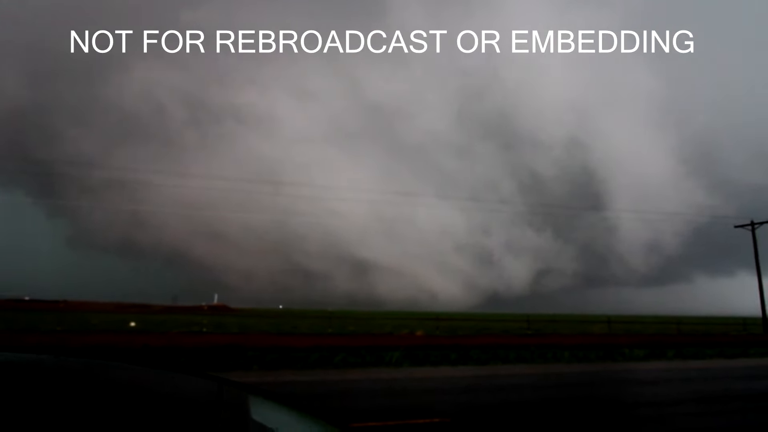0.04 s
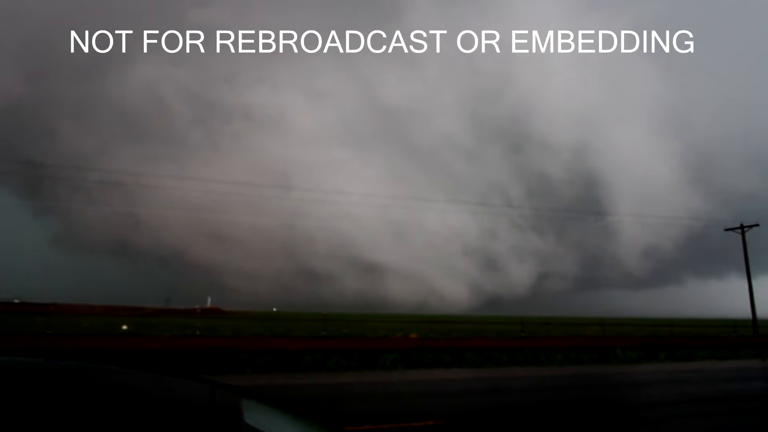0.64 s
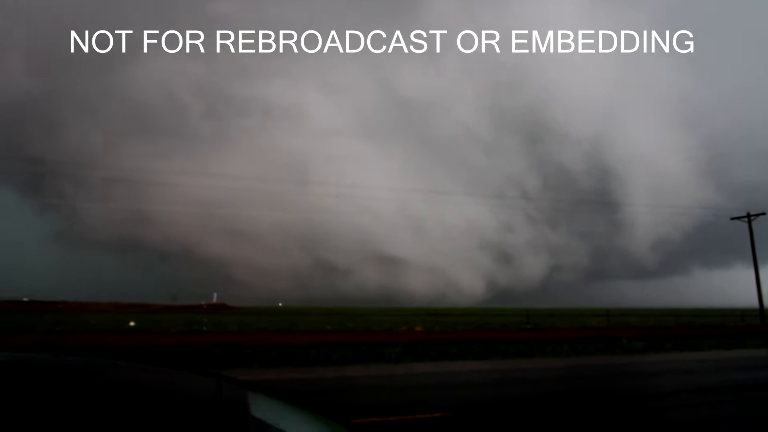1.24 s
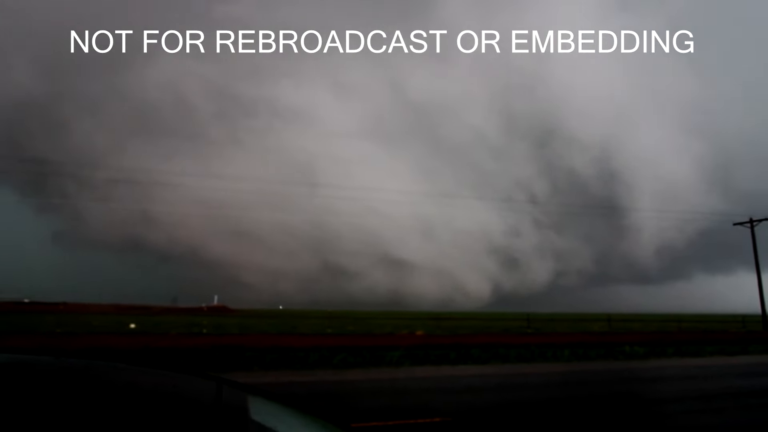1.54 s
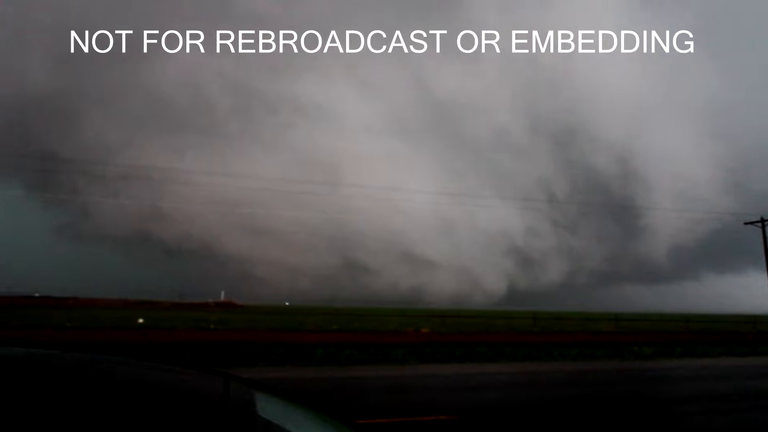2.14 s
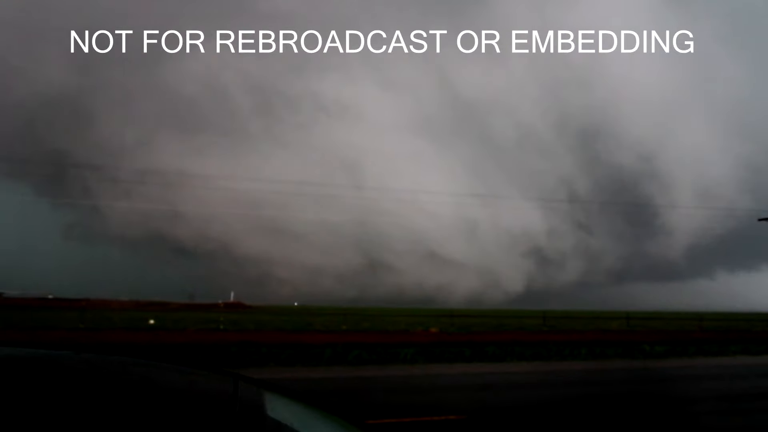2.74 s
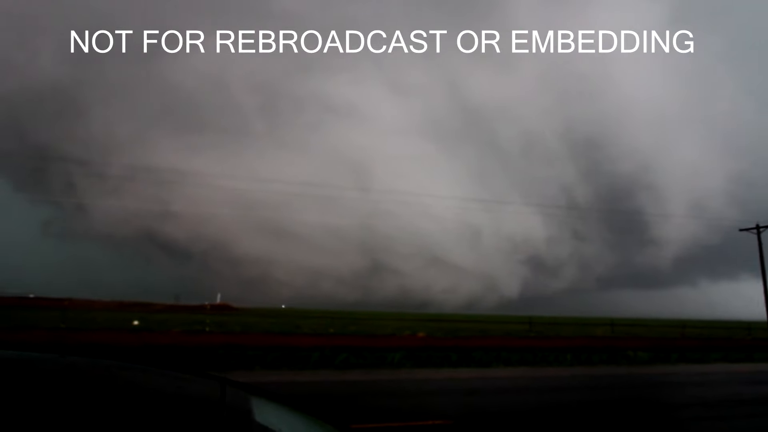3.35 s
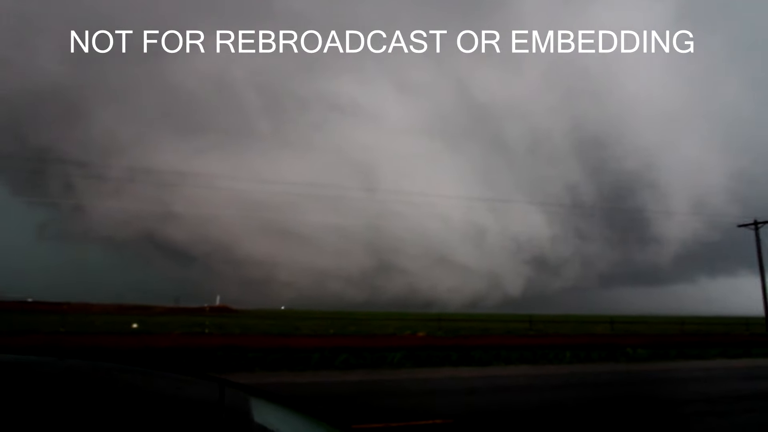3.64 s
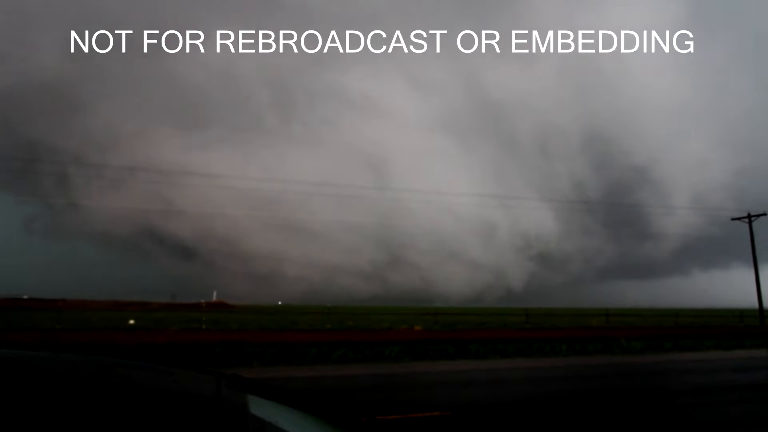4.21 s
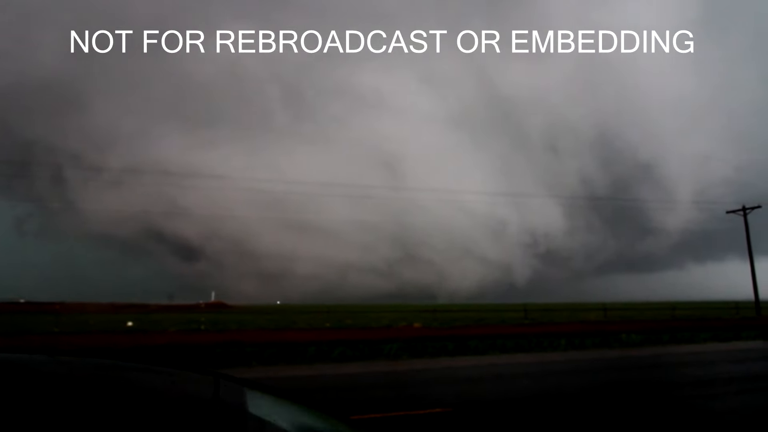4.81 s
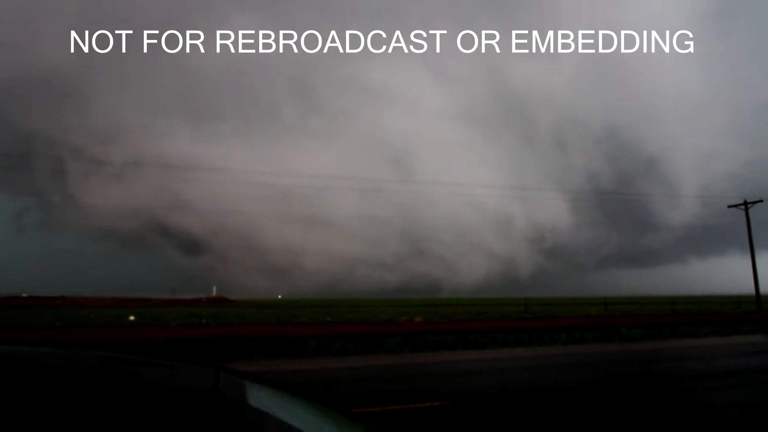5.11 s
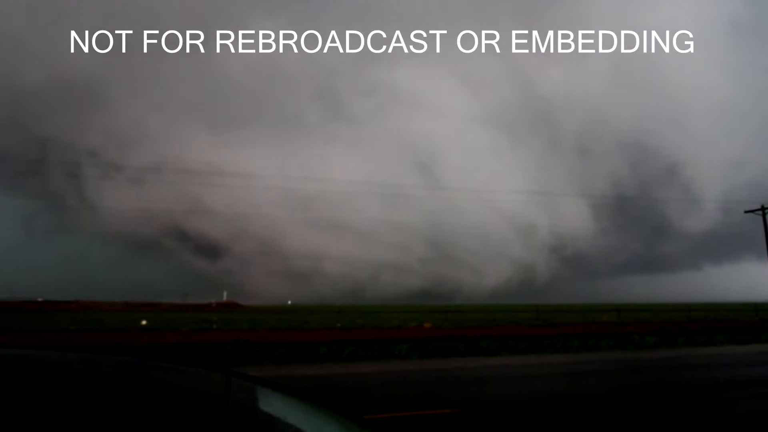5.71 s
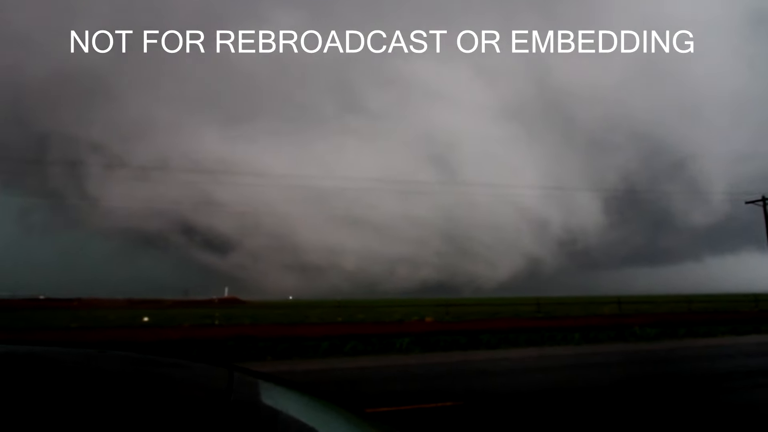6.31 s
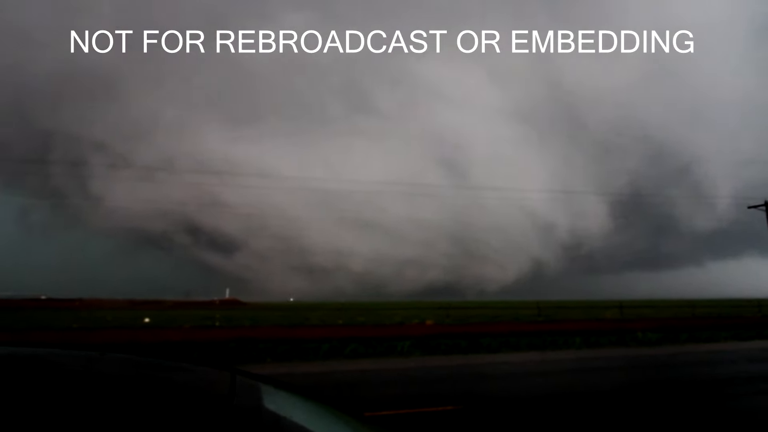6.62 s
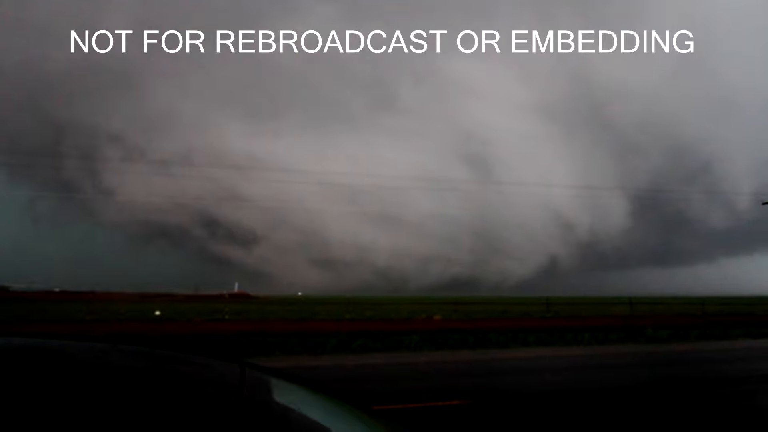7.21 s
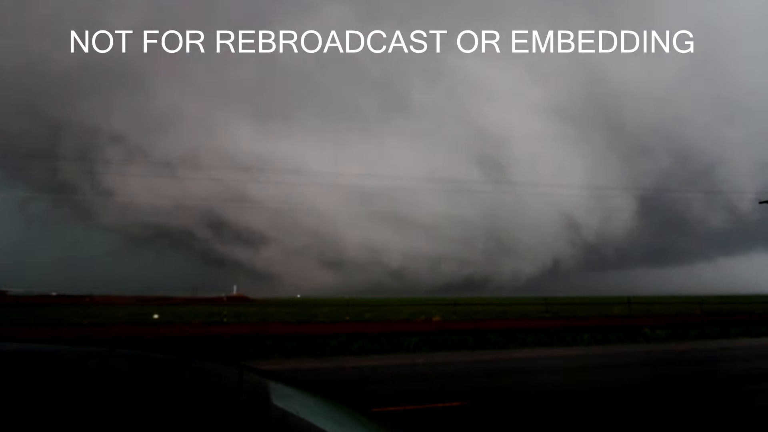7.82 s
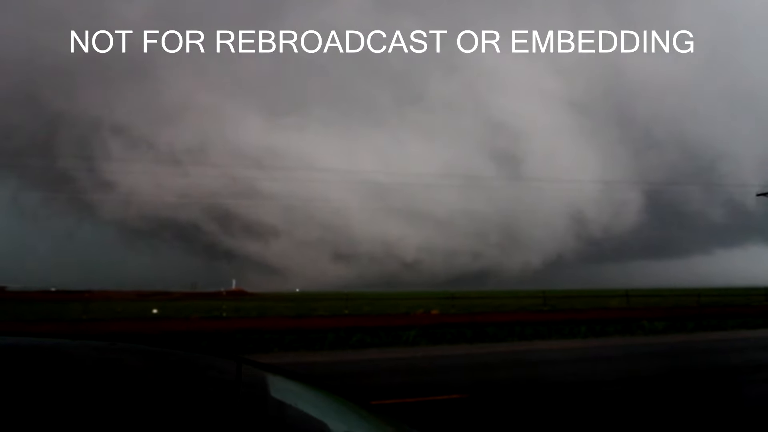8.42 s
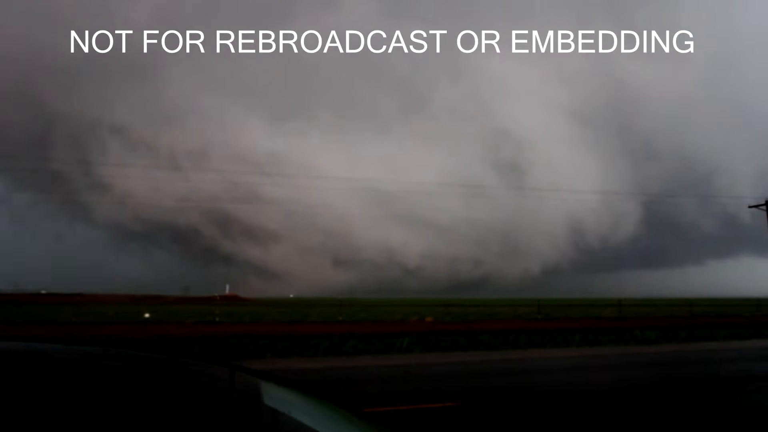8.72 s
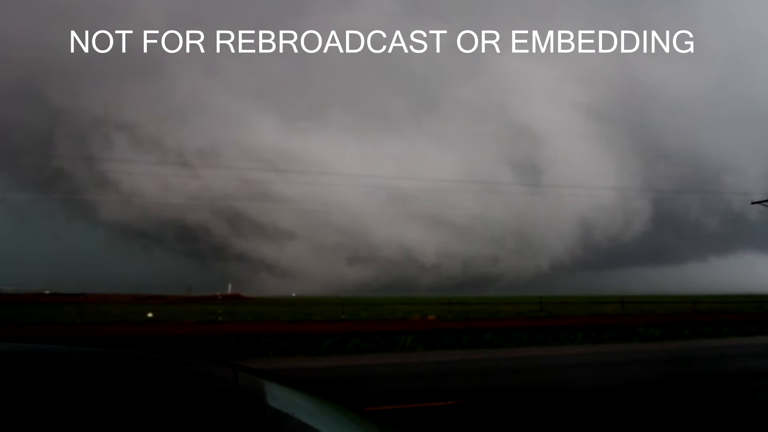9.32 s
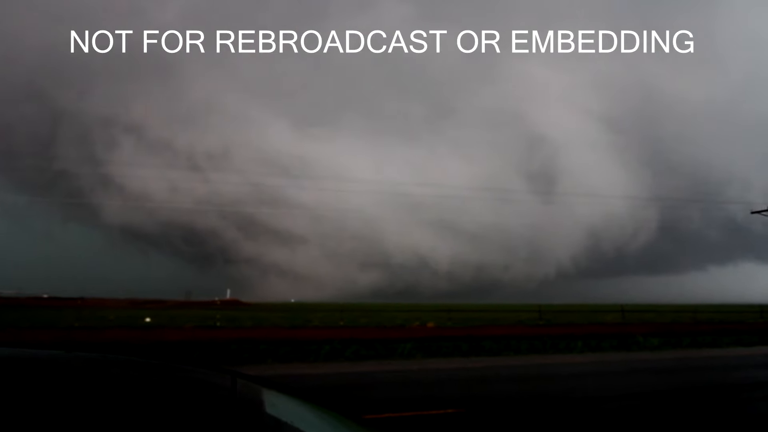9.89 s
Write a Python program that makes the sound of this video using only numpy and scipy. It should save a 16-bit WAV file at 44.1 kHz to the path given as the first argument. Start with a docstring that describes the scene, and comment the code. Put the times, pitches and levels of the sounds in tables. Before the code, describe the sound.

Storm wind blows straight onto a microphone in open country, a low, fluttering roar that crackles in the gusts.

```python
"""Open flat country, where a storm wind blows straight onto a camera microphone.
Eddies of air sweep over the microphone's opening and overload it: the tops of the wave are squashed
flat, and the bass cut makes each one sag. Gusts make the roar denser and more crackly; in the lulls
the wind briefly lets go. A faint hiss lies underneath, and the camera evens out the loudness."""
import sys
import numpy as np
from scipy import signal
from scipy.fft import rfft, irfft, next_fast_len
from scipy.io import wavfile
from scipy.ndimage import map_coordinates

SR = 44100
rng = np.random.default_rng(int(sys.argv[2]) if len(sys.argv) > 2 else 0)


def generate_wav(sig):
    """Save sig (samples, or channels by samples) to the path in sys.argv[1] as 16-bit PCM at SR."""
    pcm = np.round(np.clip(np.atleast_2d(sig).T, -1, 1) * 32767).astype(np.int16)
    wavfile.write(sys.argv[1], SR, pcm)


N = 438794


# The deep rumble of large eddies. Each row: pitch in Hz, relative level in dB.
EDDY_SPECTRUM = [(10, -16.5), (40, -3.5), (100, 1.5), (200, -0.5), (400, -6), (800, -15), (1600, -28),
                 (4000, -46), (12000, -100)]
# The slow drift in their pace. Each row: time in seconds, change of pace in dB (plus is faster).
EDDY_PACE = [(0, 0.31), (1.399, -.5), (2.2, 0.9049), (3.1, -0.33), (5.2, 1), (5.7, -0.28), (6.4, 1),
             (7.2, -0.18), (8.2, 2), (9, 3), (9.95, 0.68)]
# The rasp of fine swirls at the rim of the opening. Each row: pitch in Hz, relative level in dB.
SWIRL_SPECTRUM = [(100, -33), (400, -1.5), (800, -2), (1600, -9), (3200, -15), (6400, -29.5), (15000, -45)]

def buffeting(force_db, rasp_db, hurry=.22, drive_db=7, ceiling_db=8, swirl_db=-16, burst_db=3.5):
    """Eddies and swirls push on the opening; 1 is the most pressure the microphone can follow."""
    speed = amp(hurry * force_db)
    pace = amp(np.interp(np.arange(N) / SR, *np.transpose(EDDY_PACE)))
    # swirls break off in bursts of a few milliseconds, stronger in a harder wind
    bursts = amp(swirl_db + rasp_db + .66 * force_db + burst_db * wobble(330))
    eddies = turbulence(EDDY_SPECTRUM, speed * pace)
    swirls = bursts * turbulence(SWIRL_SPECTRUM, speed)
    # the push levels off in the hardest gusts
    strength = amp(force_db) / np.hypot(1, amp(force_db - ceiling_db))
    return amp(drive_db) * strength * (eddies + swirls)


def turbulence(spectrum, speed):
    """Churning air is carried past the opening: the faster it goes, the higher it sounds."""
    pattern = unit(coloured(rng.standard_normal(N), spectrum))
    travelled = np.cumsum(speed / speed.mean())
    return map_coordinates(pattern, [travelled], mode="mirror")


def overload(pressure):
    """The microphone runs smoothly into its limit, which flattens the wave's tops and bottoms."""
    return pressure / np.hypot(1, pressure)


def bass_cut(x, sag_hz=175, rumble_hz=14):
    """Two gentle filters take out the deep bass, so each flat top sags to zero within milliseconds."""
    return filtered(x, lambda hz: 1j * hz / (sag_hz + 1j * hz) * 1j * hz / (rumble_hz + 1j * hz))


# The slow swell of the wind. Each row: time in seconds, force in dB above or below the usual.
WIND_SWELL = [(0, -8.5), (.45, -7), (.62, 2.5), (.82, 2.5), (1.05, -1.5), (1.7, -2.5), (2.15, -1),
              (2.55, 5.5), (2.8, 4.5), (2.93, -2.5), (4.4, -1.5), (4.9, .5), (5.2, 6.5), (5.47, 6),
              (5.56, -.5), (6.35, 2), (6.65, -2.5), (7.4, -5), (7.9, 1), (8.95, 1.5), (9.95, -.5)]

def wind(sway_db=.5, flutter_db=.85, shiver_db=1.2, falter_db=1.8, steadying=.0857):
    """The wind swells, gusts and drops. Gives its force and the change in the swirls, both in dB."""
    t = np.arange(N) / SR
    jump_db, rasp_db = gusts(t)
    force_db = np.interp(t, *np.transpose(WIND_SWELL)) + jump_db
    unrest_db = flutter_db * wobble(45) + shiver_db * wobble(220)
    unrest_db -= falter_db * np.maximum(wobble(130), 0) ** 2  # dips of a few milliseconds
    unrest_db += sway_db * wobble(25)  # slower eddies make the flow sway
    unrest_db *= np.exp(-steadying * force_db)  # a full gust is steadier than a slack wind
    return force_db - lulls(t) + unrest_db, rasp_db


# Gusts and short slaps of air.
# Each row: start in seconds, length in seconds, rise in force in dB, change in the swirls in dB.
GUST_HITS = [(.1, .05, 4, 3.5), (0.224, .05, 5, -5.5), (0.476, .06, 3.5, -1.5), (0.78, .025, 1.5, -1),
             (1.328, .12, 4, 0), (1.868, 0.1608, 5.5, -3), (2.241, .12, 4.5, -1.5), (2.975, 0.038, 3, 3),
             (3.187, 0.0057, 5, 2.5), (3.381, .19, 4.5, -1), (3.879, .07, 6.5, -6), (4.169, .1, 3, -0.5),
             (4.765, .04, 3, -1.5), (5.021, 0.0296, 3.5, 4), (5.893, .1, 2, 1), (6.094, 0.0293, 2, 0),
             (6.812, .02, 5, 5), (7.505, 0.1415, 4, -2.5), (7.87, .1, 1, 2.5), (8.235, 0.166, 3, 0),
             (8.832, .17, 2, -1.5), (9.658, .15, 3, -2)]

def gusts(t, attack_s=.0051, release_s=.0351):
    """Each gust strikes fast, holds and dies away. Gives the dB added to the force and the swirls."""
    jump_db, rasp_db = np.zeros((2, N))
    for start, length, rise_db, extra_db in GUST_HITS:
        attack = 1 - np.exp(-np.maximum(t - start, 0) / attack_s)
        shape = attack * np.exp(-np.maximum(t - start - length, 0) / release_s)
        jump_db += rise_db * shape
        rasp_db += extra_db * shape
    return jump_db, rasp_db


# Brief lulls. Each row: deepest moment in seconds, fading time in seconds, depth in dB.
LULL_DIPS = [(.218, .025, 7.5), (0.393, 0.0114, 11.5), (.474, .08, 4.5), (.718, .012, 8), (1.235, .02, 7),
             (1.317, .018, 8.5), (1.866, .018, 8), (3.234, .022, 8), (3.374, 0.017, 8), (3.87, .033, 12),
             (4.126, .06, 5), (4.339, 0.016, 6.5), (4.595, 0.0212, 4.5), (4.757, .05, 5),
             (5.548, 0.0124, 6.5), (5.859, .04, 5.5), (6.745, .11, 4), (7.135, .013, 16),
             (7.504, 0.011, 11.5), (9.565, 0.0707, 3.5)]

def lulls(t, return_s=.004):
    """The wind lets go of the opening, then snaps back. Gives the drop in dB."""
    drop_db = np.zeros(N)
    for deepest, fade_s, depth_db in LULL_DIPS:
        width_s = np.where(t < deepest, fade_s, return_s)
        drop_db += depth_db * np.exp(-((t - deepest) / width_s) ** 2)
    return drop_db


# Air rushing around the camera. Each row: pitch in Hz, relative level in dB.
HISS_SPECTRUM = [(200, -4), (1000, 2), (3000, -5), (6000, -5), (10000, -9), (16000, -18)]

def hiss(force_db, hiss_db=-48, floor_db=-57, growth=1.5):
    """A faint rush of air that rises with the force of the wind and never quite stops."""
    level = amp(hiss_db + growth * force_db) + amp(floor_db)
    return level * unit(coloured(rng.standard_normal(N), HISS_SPECTRUM))


def gain_control(x, threshold_db=-19, squeeze=.55, response_s=.15):
    """The camera turns itself down when the recent loudness passes its threshold."""
    memory = np.exp(-1 / (response_s * SR))
    power = signal.lfilter([1 - memory], [1, -memory], x ** 2, zi=[np.mean(x ** 2)])[0]
    over_db = np.maximum(10 * np.log10(power + 1e-12) - threshold_db, 0)
    return x * amp(-squeeze * over_db)


def amp(db):
    """Turn decibels into a number to multiply by."""
    return 10 ** (np.asarray(db) / 20)


def unit(x):
    """Scale a sound to an average (rms) level of 1."""
    return x / np.sqrt(np.mean(x ** 2) + 1e-20)


def wobble(rate):
    """A smooth curve through `rate` random values a second."""
    return map_coordinates(rng.standard_normal(N // 8), [np.arange(N) * rate / SR], mode="wrap")


def filtered(x, response):
    """Multiply each frequency in a sound by response(hz)."""
    size = next_fast_len(N + SR // 2)
    return irfft(rfft(x, size) * response(np.fft.rfftfreq(size, 1 / SR)), size)[:N]


def coloured(x, spectrum):
    """Shape a sound's bass and treble along a curve through (Hz, dB) points."""
    points_hz, points_db = np.transpose(spectrum)
    return filtered(x, lambda hz: amp(np.interp(np.log(hz + 1), np.log(points_hz + 1), points_db)))


def scene(level_db=-1.0):
    """The overloaded microphone roars over a thin hiss."""
    force_db, rasp_db = wind()
    pressure = buffeting(force_db, rasp_db)
    roar = bass_cut(overload(pressure))
    return (amp(level_db) * (roar + hiss(force_db)))[None]


# How well the microphone hears low and high sounds. Each row: pitch in Hz, level change in dB.
MICROPHONE_RESPONSE = [(25, -8), (60, -3.5), (150, -3), (500, -1.5), (1500, -2), (3500, -2.5), (7000, -3.5),
                       (11000, -5.5), (16000, -8.5)]

def record(dry, top_hz=15900):
    """The microphone softens bass and treble; the camera evens the level and cuts the highest sounds."""
    sound = gain_control(coloured(dry[0], MICROPHONE_RESPONSE))
    return filtered(sound, lambda hz: hz < top_hz)[None]


dry = scene()
out = record(dry)
generate_wav(out)
```